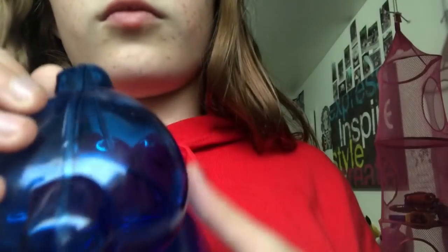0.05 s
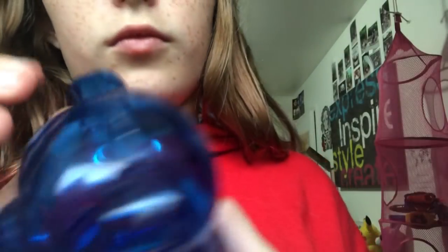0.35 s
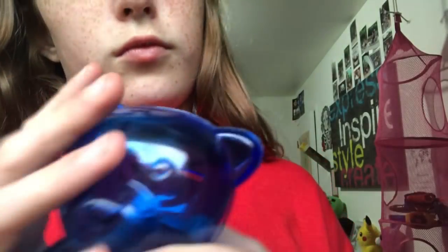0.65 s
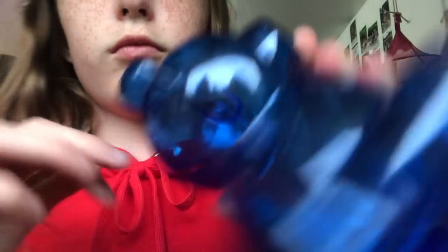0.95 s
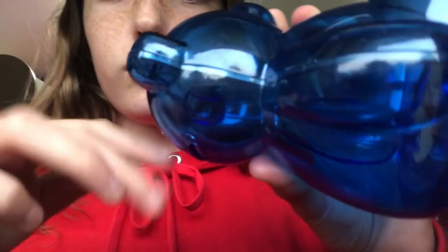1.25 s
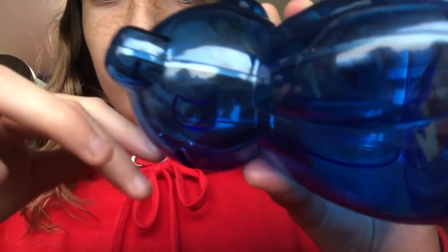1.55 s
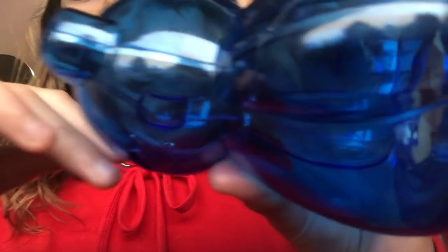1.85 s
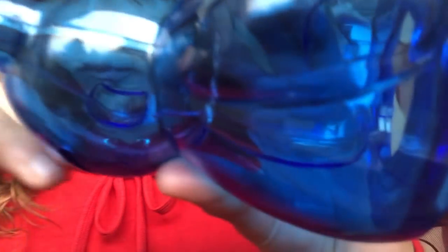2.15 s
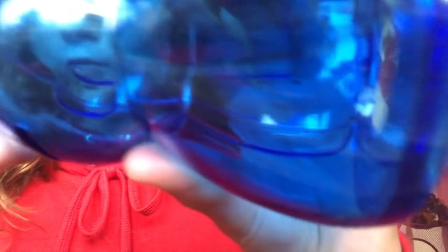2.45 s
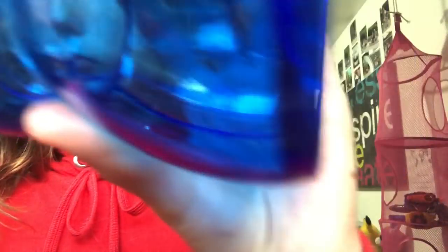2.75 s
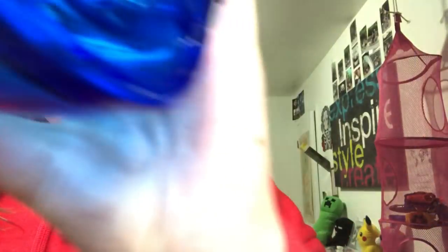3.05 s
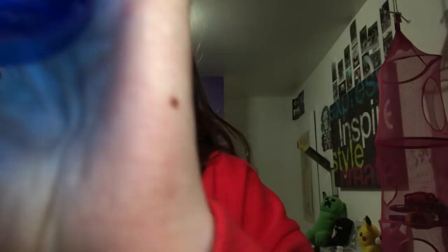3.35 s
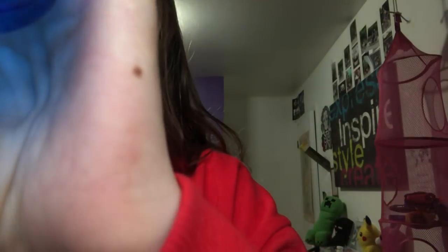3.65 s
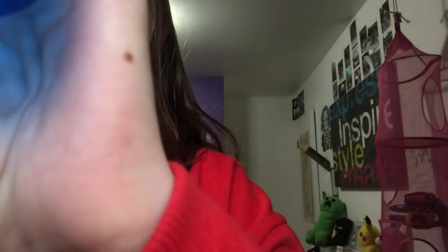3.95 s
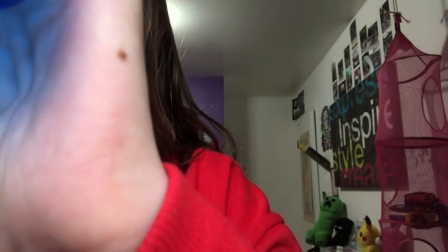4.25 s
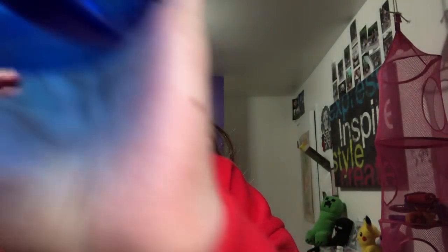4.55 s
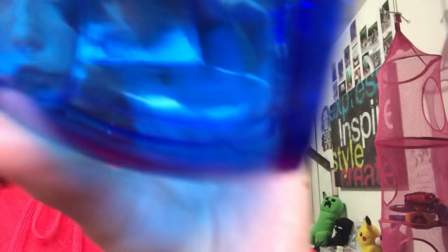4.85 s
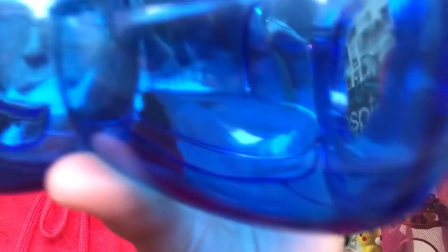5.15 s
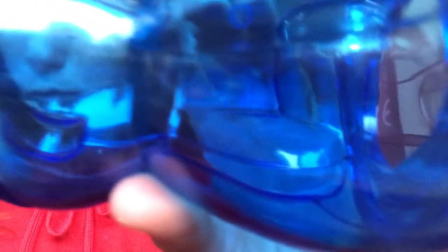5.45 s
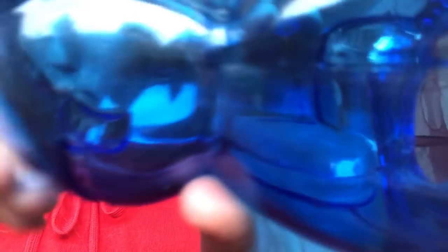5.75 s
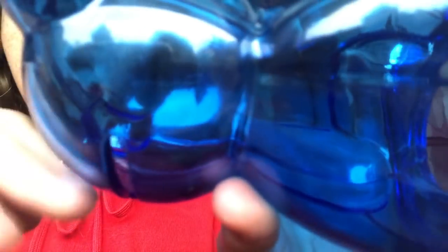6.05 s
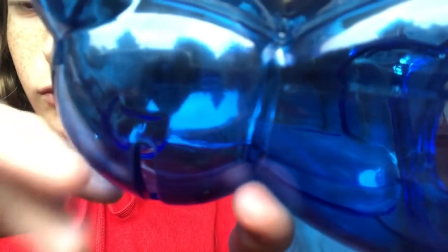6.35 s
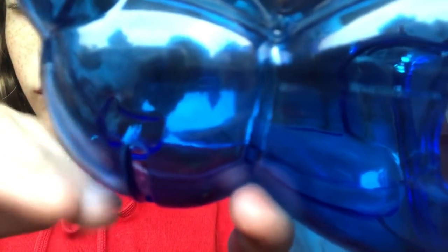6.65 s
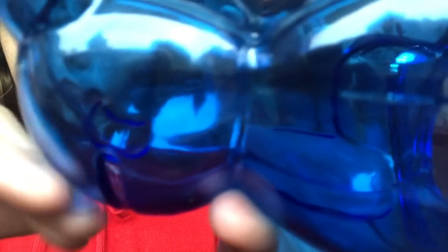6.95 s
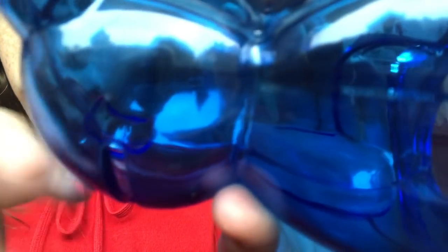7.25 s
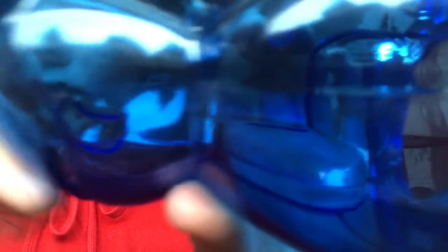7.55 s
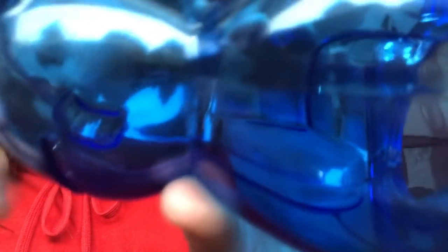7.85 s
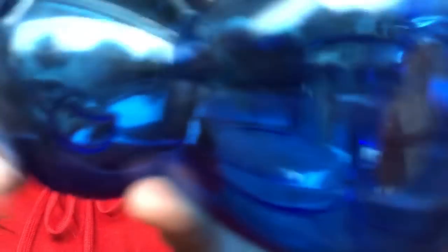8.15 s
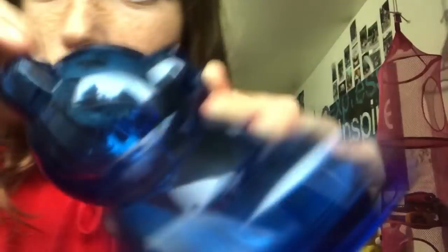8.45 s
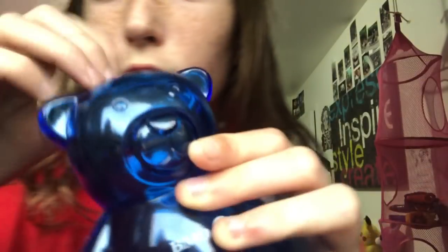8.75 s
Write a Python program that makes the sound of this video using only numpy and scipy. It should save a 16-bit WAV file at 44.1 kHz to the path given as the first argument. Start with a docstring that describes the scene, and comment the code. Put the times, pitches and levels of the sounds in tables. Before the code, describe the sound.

A hard, hollow plastic container is turned in the hands with faint rubbing, soft bumps and a tiny fingertip squeak. Then fingernails drum on it in a quick, uneven run of bright clicks, each with a brief ring and a light hollow knock. The tone shifts as the fingers wander, with an occasional dull bump. The tapping ends in faint rubbing. It is all close to the microphone in a quiet bedroom.

```python
"""Fingernails drumming on a plastic container

Nails tap a hard, hollow container close to a microphone in a quiet bedroom, wandering between its belly
and its head. Each nail knocks the wall and sets the shell's modes (its natural tones) ringing briefly.
Fingers bump it softly now and then. At the start and the end it is turned in the hands, so skin rubs
on the plastic; near the start a fingertip squeaks."""
import sys
import numpy as np
from scipy import signal
from scipy.fft import rfft, irfft
from scipy.io import wavfile
from scipy.ndimage import uniform_filter1d

SR = 44100
rng = np.random.default_rng(int(sys.argv[2]) if len(sys.argv) > 2 else 0)


def master_out(mix):
    """Clip the mix to full scale and print it as 16-bit PCM to the path in sys.argv[1]."""
    frames = np.transpose(np.atleast_2d(mix))
    ceiling = np.clip(frames, -1, 1)
    pcm = np.round(ceiling * 32767).astype(np.int16)
    wavfile.write(sys.argv[1], SR, pcm)


N = 396454
TIME = np.arange(N) / SR   # seconds since the scene began
AGE = np.arange(4096) / SR   # seconds since one short sound began

# The shell's modes and their strength when struck on the belly or the head. A t60 is the time to fade
# by 60 dB. Columns: pitch_hz, belly_db, head_db, t60_s
SHELL_MODES = [(1607.4, -12, -14.5, 0.034), (1757, -27.5, -26, 0.095), (1872, -10.5, -23.5, 0.1),
               (2016, -19.5, -15, 0.13), (2112, -13.5, -47, 0.013), (2806, -18, -25, 0.45),
               (3056, -11, -22.5, 0.11), (3190, -27, -6.5, 0.23), (3572, -5.5, -6.5, 0.096),
               (3528.5, -5, -22, 0.11), (3788, -17, -4, 0.18), (4147, -39.5, -6, 0.28),
               (4135, -43.5, -16.5, 0.0093), (4147, -17, -36, 0.12), (4140, -31, -28, 0.012),
               (4840, -27, -14.5, 0.02), (4958, -12, -21.5, 0.12), (5376, -4.5, -21, 0.011),
               (6070, -13.5, -42.5, 0.066), (5740, -18, -23, 0.046), (6060, 2, -99, 0.0086),
               (6457, 0, -37.5, 0.015), (6845, -2.5, -72, 0.017), (6796, -39.5, 2.5, 0.012),
               (7972, -7, -18, 0.013), (8496, -15, -18, 0.015), (10070, -6, -25.5, 0.018),
               (10340, -6, -20, 0.012), (10690, -5, -15, 0.011), (13500, -11, -6.5, 0.011)]


def from_db(db):
    """Turn decibels into a factor to multiply by."""
    return 10 ** (np.asarray(db) / 20)


def rms_one(x):
    """Scale each sound to an average strength (rms) of 1."""
    return x / np.sqrt(np.mean(x ** 2, axis=-1, keepdims=True) + 1e-20)


def band(x, low_hz, high_hz, order=2):
    """Keep the part of a sound between two frequencies."""
    edges_hz = [low_hz, min(high_hz, .45 * SR)]
    return signal.sosfilt(signal.butter(order, edges_hz, "band", fs=SR, output="sos"), x)


def coloured_noise(spectrum, shape):
    """Noise with a given balance of low and high frequencies, rms 1."""
    hz, db = np.transpose(spectrum)
    bins_hz = np.fft.rfftfreq(shape[-1], 1 / SR) + 1
    gain = from_db(np.interp(np.log(bins_hz), np.log(hz), db))
    return rms_one(irfft(rfft(rng.standard_normal(shape)) * gain, shape[-1]))


def dying(t60_s):
    """A fade that falls 60 dB in the given time."""
    return from_db(-60 * AGE / t60_s)


def laid_out(starts_s, sounds):
    """Place short sounds at their moments in the scene."""
    out = np.zeros(N + len(AGE))
    for start_s, sound in zip(starts_s, sounds):
        at = int(np.clip(start_s * SR, 0, N))
        out[at:at + len(AGE)] += sound
    return out[:N]


def room_hush(trim_db=-1.0):
    """Faint, low room noise whose level drifts up and down."""
    # The tone of the noise. Columns: frequency_hz, relative_db
    colour = [(15, -48.5), (25, 9), (82, 7), (249, 9), (695, 0), (1370, -3.5), (1610, -3), (1890, -2.5),
              (2280, -8), (3080, -6.5), (3340, -6), (3620, -6), (6050, -9.5), (12200, -17), (16000, -19)]
    # Its drifting level. Columns: time_s, level_db
    drift = [(0.0, -60.5), (0.53, -66), (0.9, -60.5), (1.23, -69), (2.9, -67), (3.43, -62.5), (4.01, -67),
             (5.71, -63.5), (6.08, -66), (8.36, -61), (8.66, -66), (8.99, -65)]
    level_db = np.interp(TIME, *np.transpose(drift))
    return from_db(level_db + trim_db) * coloured_noise(colour, (N,))


def bedroom_echoes(x, level_db=-17.5, near_t60_s=0.076, far_t60_s=0.23, far_db=-8):
    """Reflections from nearby things die fast; a fainter, duller tail lingers in the room."""
    first_echo_s, build_s = 0.0011, 0.00077
    t = np.arange(int(.7 * SR)) / SR
    near_noise, far_noise = rng.standard_normal((2, len(t)))
    near = band(near_noise, 120, 9000, order=1) * from_db(-60 * t / near_t60_s)
    far = band(far_noise, 130, 4500, order=1) * from_db(far_db - 60 * t / far_t60_s)
    echoes = (near + far) * (1 - np.exp(-np.maximum(t - first_echo_s, 0) / build_s))
    return from_db(level_db) * signal.fftconvolve(x, echoes / np.linalg.norm(echoes))[:N]


def soft_ring(dull_above_hz=1900):
    """The shell's answer to a soft jerk of skin, which favours its lowest modes."""
    out = np.zeros(len(AGE))
    for hz, _, head_db, t60_s in SHELL_MODES:
        softness = np.exp(-(hz / dull_above_hz) ** 2)
        out += from_db(head_db) * softness * dying(t60_s) * np.sin(2 * np.pi * hz * AGE)
    return out


def stroke(start_s, length_s, rise_share=0.3):
    """The pressure of sliding skin builds and eases off again."""
    return np.interp(TIME, [start_s, start_s + length_s * rise_share, start_s + length_s], [0, 1, 0])


def skin_rubbing(slips_per_s=380, slip_spread_db=3.0, trim_db=0.5, shell_db=-3):
    """Skin sticks and slips in tiny jerks that hiss and stir the shell's modes."""
    # Strokes of skin along the plastic. Columns: start_s, length_s, level_db
    strokes = [(0.0, 0.093, -63.5), (0.074, 0.39, -71), (.265, 0.17, -58), (0.383, 0.31, -72),
               (0.559, 0.078, -58.5), (0.622, 0.073, -59), (0.759, 0.059, -53), (0.811, 0.044, -52),
               (.83, 0.2, -69), (8.33, 0.078, -53.5), (8.4, 0.094, -51), (8.46, 0.21, -60),
               (8.62, 0.2, -68.5), (8.808, .12, -58)]
    # The tone of the hiss. Columns: frequency_hz, relative_db
    colour = [(240, -37), (400, 4), (655, 3), (1040, 4), (1130, -31), (1840, 4), (2290, -1), (2930, 7),
              (3370, -70), (3640, 5), (5030, -2), (8110, -1.5), (16000, -20)]
    slips = (rng.random(N) < slips_per_s / SR) * rng.choice([-1, 1], N)
    slips = slips * from_db(slip_spread_db * np.minimum(rng.exponential(1, N), 4))
    slip_strength = np.sqrt(uniform_filter1d(slips ** 2, size=80).clip(0))
    hiss = rms_one(coloured_noise(colour, (N,)) * slip_strength)
    ring = rms_one(signal.fftconvolve(slips, soft_ring())[:N])
    pressure = sum(from_db(db) * stroke(start_s, length_s) for start_s, length_s, db in strokes)
    return from_db(trim_db) * pressure * rms_one(hiss + from_db(shell_db) * ring)


def fingertip_squeak(jitter=0.0556, tone_db=-5, shell_db=-1):
    """Slips lock into a rough rhythm: a low tone, with overtones picked out by the shell."""
    # The course of the dragging fingertip. Columns: time_s, slips_per_s, level_db
    drag = [(0.281, 580, -58), (.31, 600, -80), (0.34, 530, -50.5), (0.357, 790, -89), (0.369, 520, -49),
            (0.387, 466, -81)]
    time_s, slips_per_s, level_db = np.transpose(drag)
    waver = rms_one(uniform_filter1d(rng.standard_normal(N), size=150))
    cycles = np.cumsum(np.interp(TIME, time_s, slips_per_s) * (1 + jitter * waver)) / SR
    slips = np.diff(np.floor(cycles), prepend=0)   # one jerk per cycle
    ring = rms_one(signal.fftconvolve(slips, soft_ring())[:N])
    loudness = np.interp(TIME, time_s, from_db(level_db), left=0, right=0)
    return loudness * (from_db(tone_db) * np.sin(2 * np.pi * cycles) + from_db(shell_db) * ring)


def wall_push(low_hz, high_hz):
    """A finger pushes the wall, which shoves the air: one rounded pulse, rms 1."""
    return rms_one(band(signal.unit_impulse(len(AGE)), low_hz, high_hz, order=3))


def finger_bumps(thud_db=-8.0, knock_db=-7.0, hollow_db=-6, shell_db=-22):
    """Flesh makes a round thud, higher the firmer it lands, and a hollow knock that stirs the shell."""
    # Soft finger contacts. Columns: start_s, level_db, firmness (0 all thud, 1 nearly all knock)
    bumps = [(0.14, -49.5, 0.28), (0.155, -49.5, 0.22), (0.217, -54.5, 0.43), (0.596, -58, 0.11),
             (0.617, -53.5, 0.081), (0.762, -52.5, 0.1), (0.834, -56.5, 0.72), (0.862, -56, 0.2),
             (1.049, -64.5, 0.63), (2.944, -53.5, 0.21), (3.019, -50.1, 0.63), (3.478, -36.5, 0.4),
             (3.493, -45, 0.074), (3.53, -51.8, 0.18), (4.43, -57, 0.56), (5.313, -51, 0.75),
             (5.354, -57.5, 1), (7.024, -41.5, 0.59), (7.664, -38.5, 0.63), (8.072, -43.5, 0.83),
             (8.133, -40, 0.58), (8.427, -45.5, 0.79), (8.624, -54.5, 0.19), (8.676, -57.6, 0.54),
             (8.797, -37.5, 0.85), (8.813, -40, 0.75), (8.838, -46.5, 0.59), (8.874, -52.5, 0.48),
             (8.975, -41, 0.82)]
    soft_hz, firm_hz, width_ratio, hollow_hz = 85, 210, 1.68, 660
    start_s, level_db, firmness = np.transpose(bumps)
    firmness = np.clip(firmness, 0, .98)
    thud_hz = soft_hz + (firm_hz - soft_hz) * firmness
    pulses = np.array([wall_push(hz / width_ratio, hz * width_ratio) for hz in thud_hz])
    thuds = from_db(thud_db) * np.sqrt(1 - firmness ** 2)[:, None] * pulses
    swell = 1 - np.exp(-AGE * hollow_hz)
    hollow = rms_one(np.sin(2 * np.pi * hollow_hz * AGE) * dying(t60_s=0.032) * swell)
    knock = from_db(knock_db) * rms_one(wall_push(302, 834) + from_db(hollow_db) * hollow)
    ring = from_db(shell_db) * rms_one(soft_ring(dull_above_hz=2600))
    return laid_out(start_s, from_db(level_db)[:, None] * (thuds + firmness[:, None] * (knock + ring)))


def nail_rings(place, favoured_hz, favour_db=6, favour_width_hz=90, scatter_db=2.0, detune=0.0055):
    """One ring for each tap: the spot decides the mode strengths, the grip shifts their pitch a little."""
    # Modes too crowded to hear singly, played as noise. Columns: frequency_hz, relative_db
    crowded_modes = [(1300, -14.5), (2400, -10), (3200, 0.5), (5000, -3.5), (6500, 0.5), (8000, 0),
                     (9200, 0.5), (10400, 3), (12000, 3), (15500, -5.5)]
    crowd_db, crowd_rise_s, rise_cycles = -4, 0.00034, 2.4
    t60_stretch, touched_t60_s = 1.884, 0.029
    free_t60_s, after_ring_db = 0.11, -22
    crowd = coloured_noise(crowded_modes, (len(place), len(AGE)))
    out = from_db(crowd_db) * crowd * dying(t60_s=0.027) * (1 - np.exp(-AGE / crowd_rise_s))
    for hz, belly_db, head_db, t60_s in SHELL_MODES:
        strength, shift, phase = rng.standard_normal((len(place), 3)).T[:, :, None]
        # A mode is louder when the nail lands where it swings most.
        favour = np.exp(-((hz - favoured_hz) / favour_width_hz) ** 2)
        mode_db = belly_db + (head_db - belly_db) * place + favour_db * favour
        gain = from_db(mode_db[:, None] + scatter_db * strength)
        swell = 1 - np.exp(-AGE * hz / rise_cycles)   # bending waves need a moment to fill the shell
        # The finger stays on the wall and cuts long rings short; on the belly they ring on faintly.
        touched = dying(min(t60_s * t60_stretch, touched_t60_s))
        freedom = min(t60_s / free_t60_s, 1) ** 3 * (1 - place)[:, None]
        fade = touched + from_db(after_ring_db) * freedom * dying(t60_s)
        out += gain * swell * fade * np.sin(2 * np.pi * (hz * (1 + detune * shift) * AGE + phase))
    return out


def nail_knocks(level_db, hardness_db, boost_db, hollow_hz=690, hollow_db=-14, weight_db=-8):
    """A hollow knock and the finger's weight lie under each ring and stand out in soft taps."""
    base_db, ordinary_tap_db, force_share, hardness_share = -65, -30, 0.56, -0.051
    hollow = from_db(hollow_db) * rms_one(np.sin(2 * np.pi * hollow_hz * AGE) * dying(t60_s=0.12))
    weight = from_db(weight_db) * wall_push(66.4, 161)
    knock_db = base_db + force_share * (level_db - ordinary_tap_db) + hardness_share * hardness_db
    return from_db(knock_db + boost_db)[:, None] * (wall_push(151, 1200) + hollow + weight)


def nail_taps(ring_db=-8.5):
    """Each nail knocks the wall and rings the shell; a harder nail makes a brighter ring."""
    # The strikes, nearly all by nails; the one at 0.1955 s is a knuckle knock. Columns: start_s, level_db,
    # favoured_hz, hardness_db (more means more treble)
    taps = [(0.1018, -64, 2800, -3.3), (0.1955, -60.5, 2740.0, -5), (0.3649, -45, 3350, -12),
            (0.5934, -58, 3070, -2.7), (0.645, -57, 4170, -5), (0.7799, -45, 3530.0, -14),
            (0.816, -59, 3470, -2), (1.1594, -77, 2750, -11), (1.457, -31, 3380, -7.4),
            (1.5214, -35.5, 3670, -18), (1.6115, -39.5, 3630, -5), (1.7047, -44.5, 3630, -7.5),
            (1.7769, -38.5, 3420, -4), (1.8498, -35, 3770, -6), (1.9228, -38, 3640, -5.5),
            (1.9844, -36.5, 3780, -5), (2.0917, -34, 3780, -5.5), (2.1511, -50.5, 3550.0, -19),
            (2.2372, -39, 3800, -6), (2.289, -36.5, 3520, -5.5), (2.4133, -32, 3600, -7.5),
            (2.4732, -27.5, 3350, -8.5), (2.574, -33.5, 3680, -11.5), (2.6497, -22, 3500, -7.5),
            (2.7694, -31, 3550.0, -7), (2.8373, -27.5, 3540, -6.5), (2.9373, -23.5, 3660, -5.6),
            (3.0133, -20.5, 3670, -7), (3.1291, -20.5, 3300, -5), (3.2085, -18, 3630, -6.5),
            (3.3268, -27.5, 3480, -5.0), (3.3872, -19.5, 3500, -3), (3.514, -31, 3500, -6.5),
            (3.5903, -23.5, 3500, -4.5), (3.691, -31, 3470, -3.5), (3.769, -21.5, 3560.0, -2.5),
            (3.8913, -30, 3600, -3), (3.9673, -23, 3500, -2.5), (4.0799, -30.5, 3590, -2),
            (4.1583, -20.5, 3550.0, -4.5), (4.2628, -26, 3580, -3.5), (4.3435, -25, 3650, -2),
            (4.4781, -32.5, 3620, -3.9), (4.5394, -29.5, 3500, -2.5), (4.6698, -45.5, 3530, -14.5),
            (4.7502, -26.5, 3580, -5), (4.8358, -35, 3780, 0), (4.9148, -39, 3670, -15),
            (4.9733, -27, 3600, -6), (5.0709, -35.0, 3600, -2), (5.1342, -40.5, 3600, -8.3),
            (5.1943, -30.5, 3710, -6.5), (5.3121, -37, 3580, -28), (5.3502, -42.5, 3600, -2.5),
            (5.414, -36.5, 3800, -2.5), (5.4956, -36.5, 3770.0, 1), (5.5491, -39, 3540.0, -4.5),
            (5.6137, -32, 3640, 0), (5.7102, -40.5, 3800, 1.5), (5.7587, -37, 3570, -3),
            (5.8265, -35.5, 3620, -1), (5.9153, -39.5, 3740, 1.3), (6.0006, -44.5, 3500, -12),
            (6.0371, -30.5, 3180.0, -6), (6.1465, -40, 3760.0, 1), (6.2675, -27, 3250, -6),
            (6.354, -41.5, 4130, 1.5), (6.4402, -46.5, 3170.0, -16), (6.4744, -25.5, 3220, -6.5),
            (6.565, -39, 4090.0, 2.5), (6.6176, -43.5, 3180.0, -20), (6.6593, -26.5, 3170.0, -7),
            (6.7465, -35.5, 4100, 2), (6.792, -41, 3200, -6.6), (6.8323, -24, 3240, -6),
            (6.925, -43.5, 4300, -1.5), (6.995, -43.5, 3230, -19), (7.0873, -34, 4040, 1.3),
            (7.1535, -42, 3180.0, -26), (7.2034, -23, 3130, -3.6), (7.2652, -30.5, 4070, 0.5),
            (7.3395, -37, 3230, -27), (7.4022, -26, 3700, 1.5), (7.4893, -29.5, 3750, 3),
            (7.513, -30.5, 3660, -3.5), (7.5961, -23.5, 3400, -2), (7.6725, -41, 3680, 5.5),
            (7.7215, -37.5, 3470, -11.5), (7.7683, -25, 3700.0, -3.0), (7.8507, -24.5, 3680, -6.7),
            (8.0705, -26, 3300, 0.5), (8.1341, -41.5, 3540.0, -11.2), (8.2314, -18.5, 3800, -6),
            (8.3388, -25.5, 3470, -4), (8.4226, -37.5, 3320, -11), (8.4877, -49.5, 3070, -4),
            (8.5447, -49.5, 3750, -5.5), (8.673, -64, 4180, 3), (8.726, -53, 4060.0, -12),
            (8.8116, -50.3, 4270, -3), (8.9729, -51.5, 2800, -3.5)]
    # Where the hand drums. Columns: time_s, place (0 belly, 1 head)
    hand_path = [(1.4, 0.18), (2.6, 0.12), (3.2, 0.063), (4.5, 0.029), (5.0, 0.51), (5.7, 0.41),
                 (6.3, 0.84), (7.3, 0.83), (8.3, 0.25)]
    # Level of the low modes and the hollow knock along the way.
    # Columns: time_s, low_boost_db, knock_boost_db
    boosts = [(.2, 19, 14.5), (.36, 8, 0), (.8, 15, 0), (1.16, 31, 19.5), (1.5, 4, -1), (2.6, 3, 1.5),
              (3.398, -2, -4), (4.599, -5, -2.5), (5.351, 8, 8.5), (5.9, 2.5, 4), (6.7, 3, 2.5),
              (7.702, 7, 9.5), (8.601, 5, 0)]
    # Four ranges of the ring: wall modes, main ring, tick and snap. Columns: low_hz, high_hz
    ranges = [(1300, 2400), (2500, 4400), (4400, 7500), (7500, 17000)]
    # How each range answers a tap. Columns: belly_db, head_db, hardness_share, boost_share
    answers = [(-18.5, -15.5, 0.23, 1), (-5.5, -6, 0.13, 0.061), (-9, -3, 0.68, 0), (-6, -11, 1, 0.26)]
    start_s, level_db, favoured_hz, hardness_db = np.transpose(taps)
    boost_s, *boost_curves = np.transpose(boosts)
    low_boost_db, knock_boost_db = (np.interp(start_s, boost_s, db) for db in boost_curves)
    place = np.clip(np.interp(start_s, *np.transpose(hand_path)), 0, 1)
    rings = nail_rings(place, favoured_hz)
    sounds = nail_knocks(level_db, hardness_db, knock_boost_db)
    for (belly_db, head_db, hardness_share, boost_share), edges_hz in zip(answers, ranges):
        spot_db = belly_db + (head_db - belly_db) * place
        colour_db = spot_db + hardness_share * hardness_db + boost_share * low_boost_db
        ring_part = rms_one(band(rings, *edges_hz, order=4))
        sounds += from_db(ring_db + level_db + colour_db)[:, None] * ring_part
    return laid_out(start_s, sounds)


def scene():
    """The container close by, the quiet room and its echoes, in one channel."""
    container = nail_taps() + finger_bumps() + skin_rubbing() + fingertip_squeak()
    return (container + room_hush() + bedroom_echoes(container))[None]


def delay_band(x, centre_hz, q):
    """Delay the range around one frequency without changing its level; a higher q narrows the range."""
    w = centre_hz * 2 * np.pi
    return signal.lfilter(*signal.bilinear([1, -w / q, w * w], [1, w / q, w * w], SR), x)


def record(dry, bass_cut_hz=40, top_cut_hz=16500):
    """The microphone lets bass through late, so knocks droop in pitch; deep bass and the top are cut."""
    late = delay_band(dry, centre_hz=120, q=0.41)
    late = delay_band(late, centre_hz=360, q=1.0)
    trimmed = signal.sosfilt(signal.butter(3, bass_cut_hz, "high", fs=SR, output="sos"), late)
    return signal.sosfilt(signal.ellip(10, .2, 70, top_cut_hz, fs=SR, output="sos"), trimmed)


dry = scene()
out = record(dry)
master_out(out)
```